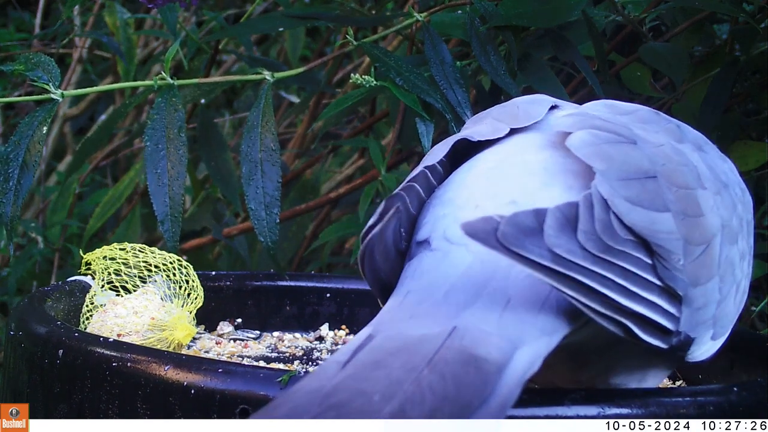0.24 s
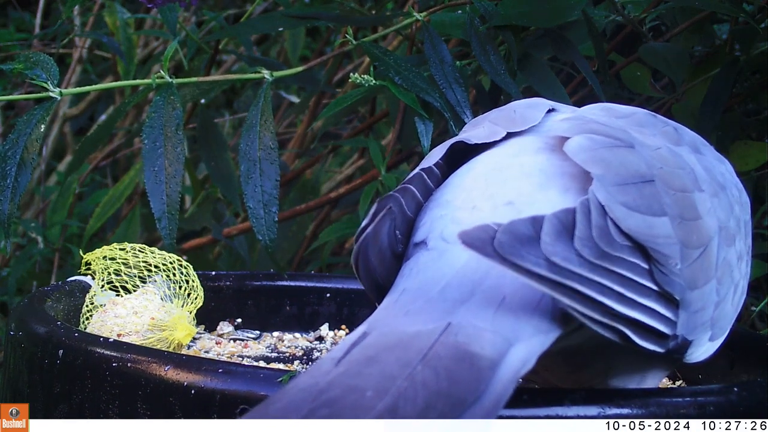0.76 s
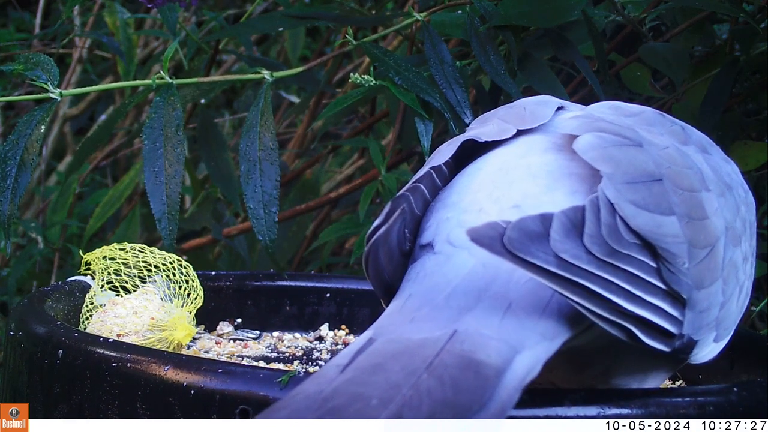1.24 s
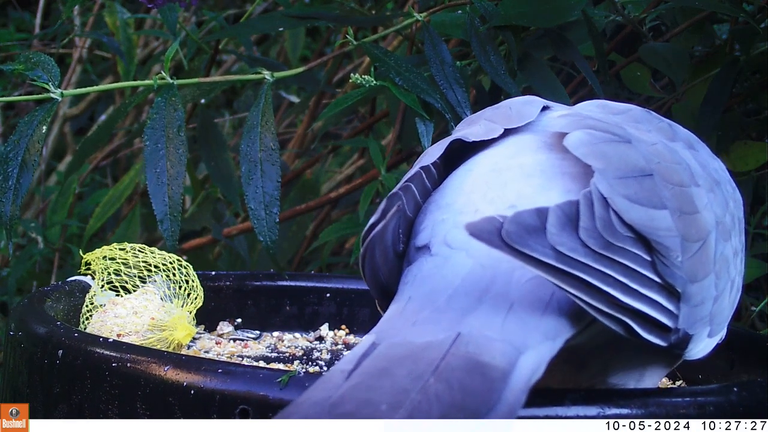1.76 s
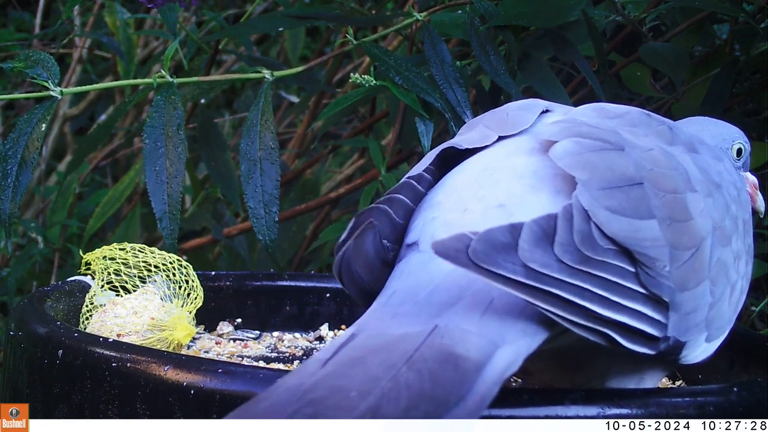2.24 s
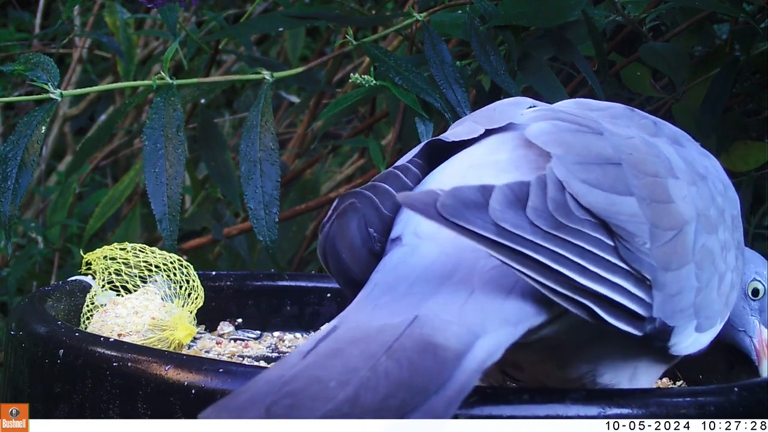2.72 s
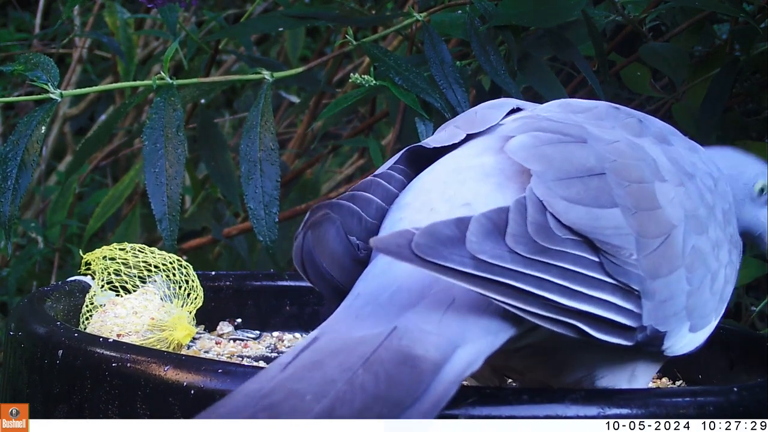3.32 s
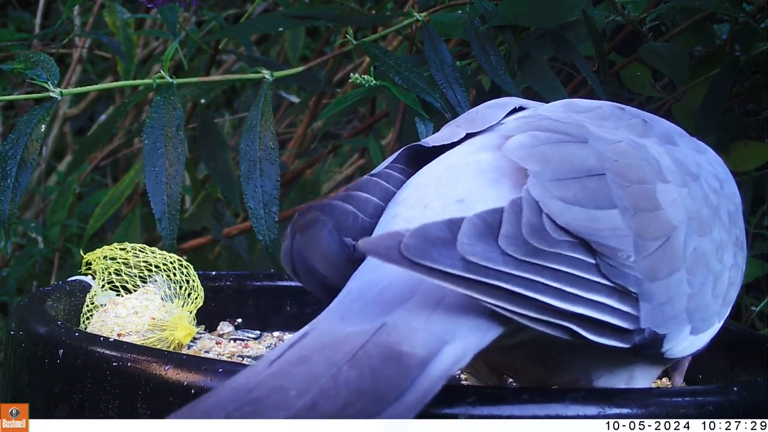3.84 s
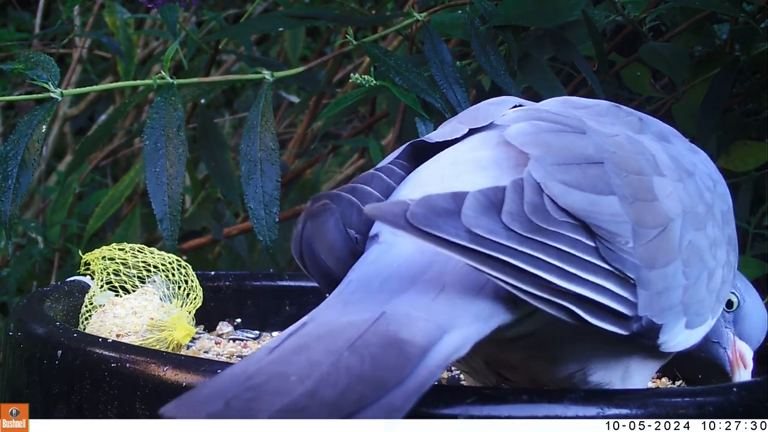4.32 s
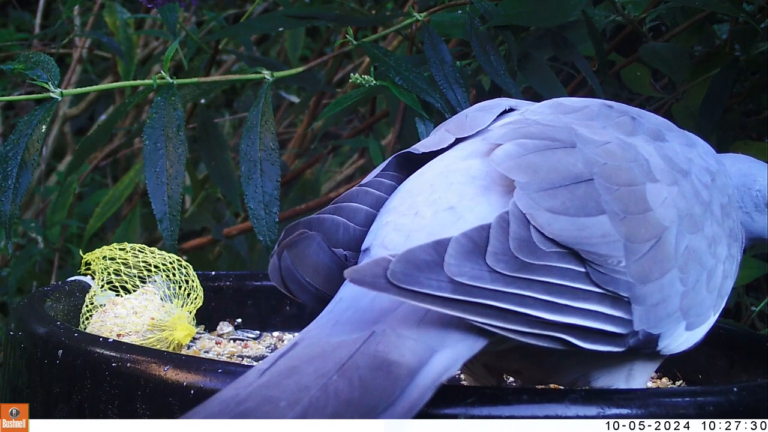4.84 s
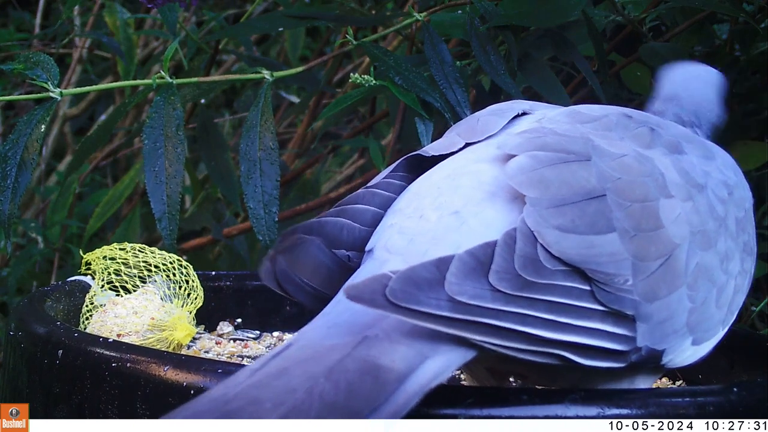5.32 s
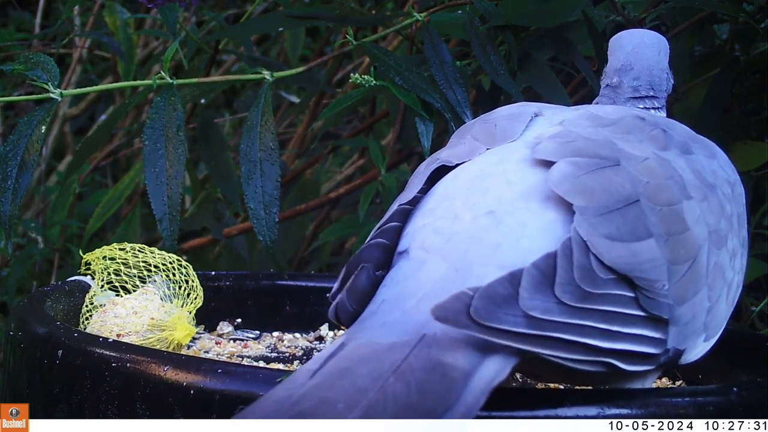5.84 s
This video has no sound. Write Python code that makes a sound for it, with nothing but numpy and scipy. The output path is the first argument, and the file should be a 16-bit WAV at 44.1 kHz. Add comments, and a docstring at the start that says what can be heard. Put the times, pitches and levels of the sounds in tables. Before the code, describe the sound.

A quiet garden heard from right beside a plastic seed dish. Throughout runs a steady deep rumble fading into soft hiss, with a low, slightly wavering hum. Very faint beak ticks come at 0.3, 1.1, 1.3 and 2.0 seconds. A quick falling chirp from a nearer small bird sounds at 0.8, fainter ones at 2.2 and 4.4. A distant songbird gives thin, echoing whistles and short buzzes from about 1.4, including a buzzy note at 2.6 and a whistle at 3.2. A small tap at 2.95 leads to a hard, bright, dry crack at 3.0, with tiny seeds pattering and light taps until 3.3. A soft tick falls at 4.0; small taps at 4.6 run into a second hard click at 4.63, slightly duller. The clearest distant whistle follows at 4.85, then faint ticks near 5.0 and a very faint high whistle at 5.8 over the rumble.

```python
"""Pigeon at a seed dish

A wood pigeon pecks seed from a plastic dish close by: filtered-noise ticks and cracks, a decaying ring of modes.
Two hard pecks stand out among light taps; loose seeds are sparse random echoes of each blow.
A songbird further off whistles and buzzes, and a nearer one chirps: gliding sines, sent through a noise echo.
Beneath lie a rumble falling into hiss, made of coloured noise, and a low hum of wavering partials."""
import sys
import numpy as np
from scipy import signal
from scipy.fft import rfft, irfft
from scipy.io import wavfile

SR = 44100
rng = np.random.default_rng(int(sys.argv[2]) if len(sys.argv) > 2 else 0)


def transcribe(u):
    """Save the signal u as a 16-bit wav file named by the first command-line argument.

    u: samples, shape (n,) or (channels, n), limited to [-1, 1]; the rate is SR.
    q: integer samples, one column per channel.
    """
    v = np.clip(np.atleast_2d(u).T, -1, 1)
    q = np.round(v * 32767).astype(np.int16)
    wavfile.write(sys.argv[1], SR, q)


N = 267642


def amp(db):
    """Decibels to gain."""
    return 10 ** (np.asarray(db) / 20)


def unit(x):
    """Scales to rms 1."""
    return x / np.sqrt(np.mean(abs(x) ** 2) + 1e-20)


def read(points, hz):
    """Reads a table along a log-frequency axis."""
    f, value = np.transpose(points)
    return np.interp(np.log(hz + 1), np.log(f + 1), value)


def add(mix, s, sound):
    """Mixes a sound in at time s."""
    part = mix[round(s * SR):][:len(sound)]
    part += sound[:len(part)]


def noise(spectrum, size):
    """Noise of rms 1 with the given colour."""
    hz = np.fft.rfftfreq(size, 1 / SR)
    white = rfft(rng.standard_normal(size))
    return unit(irfft(white * amp(read(spectrum, hz)), size))


def drift(rate_hz, size):
    """Smooth random motion: noise under a Gaussian low-pass about rate_hz wide, rms 1 over the scene."""
    hz = np.fft.rfftfreq(N, 1 / SR)
    white = rfft(rng.standard_normal(N))
    return unit(irfft(white * np.exp(-(hz / rate_hz) ** 2), N))[:size]


def delayed(x, seconds):
    """Delays a short sound by any fraction of a sample, as a phase slope."""
    size = 2 * len(x)
    hz = np.fft.rfftfreq(size, 1 / SR)
    return irfft(rfft(x, size) * np.exp(-2j * np.pi * hz * seconds))[:len(x)]


# Colour of the distant rumble falling into hiss, with a soft peak near 4 kHz:
# (frequency [Hz], relative density [dB per Hz])
AIR = [(3, -1), (14, 0), (45, -4), (90, -9), (160, -15.5), (290, -21.5), (750, -32), (1600, -39.5),
       (3200, -44.5), (3900, -43.5), (4700, -47), (7500, -49), (10000, -49.5), (13800, -49.5)]
# Partials of the low hum: (multiple of HUM_HZ, rms level [dB])
HUM = [(1, -37.5), (2, -43.5), (3, -53), (5, -53.5), (6, -57), (10, -62.5)]
HUM_HZ = 29.64


def background(air_db=-34, waver_hz=2, waver_depth=1.0):
    """Distant rumble and hiss, with a low hum whose partials waver in level and phase."""
    t = np.arange(N) / SR
    out = amp(air_db) * noise(AIR, N)
    for multiple, db in HUM:
        # complex motion moves level and phase together
        sway = 1 + waver_depth * (drift(waver_hz, N) + 1j * drift(waver_hz, N))
        tone = np.exp(2j * np.pi * (round(multiple) * HUM_HZ * t + rng.random()))
        out += amp(db) * unit((sway * tone).real)
    return out


# Decay of the garden's echo: (frequency [Hz], t60 [s])
GARDEN = [(500, 2), (4000, 0.89), (8000, 0.8), (14000, 0.73)]


def garden(x, build_s=0.0044):
    """Leaves, fences and walls scatter a sound into a tail that builds up and dies band by band."""
    hz, t, bands = signal.stft(rng.standard_normal(SR), SR, nperseg=256)
    decay = amp(-60 * t / read(GARDEN, hz)[:, None])
    build = 1 - np.exp(-t / build_s)
    tail = signal.istft(bands * decay * build, SR, nperseg=256)[1]
    return signal.fftconvolve(x, tail / np.linalg.norm(tail))[:N]


def whistles(notes, trill_hz=105, trill_spread=.35, waver=0.0033):
    """Sine glides with a fast, uneven trill of the pitch; a deep trill turns a whistle into a buzz."""
    out, unsteady, wander = np.zeros(N), drift(121.2, N), drift(40.0, N)
    trill_rate = trill_hz * (1 + trill_spread * unsteady)
    trill = np.sin(2 * np.pi * np.cumsum(trill_rate) / SR)
    for s, length, start_hz, end_hz, db, depth_hz in notes:
        at = np.arange(round(s * SR), min(round((s + length) * SR), N))
        glide = np.geomspace(start_hz, end_hz, len(at))
        hz = glide * (1 + waver * wander[at]) + depth_hz * trill[at]
        tone = np.sin(2 * np.pi * np.cumsum(hz) / SR)
        add(out, s, amp(db) * unit(tone * signal.windows.tukey(len(at), .5)))
    return out


# The far bird's clear whistles: (time [s], length [s], starting pitch [Hz], level before the mix [dB])
WHISTLES = [(1.372, .22, 5360, -64), (2.2, .09, 5410, -62), (3.165, 0.1, 4130, -43.5),
            (3.77, 0.2, 7810, -56.5), (3.94, .11, 7930, -54.5), (4.073, 0.23, 7550, -59),
            (4.475, 0.18, 7110, -50.5), (4.665, .09, 7720, -57), (4.835, .18, 3932, -32),
            (5.81, .25, 5520, -60)]
# The far bird's buzzy notes:
# (time [s], length [s], pitch [Hz], level before the mix [dB], trill depth [share of the pitch])
BUZZES = [(1.6, .05, 7150, -49.5, .08), (1.935, 0.048, 7150, -51.5, .1), (2.58, 0.098, 4640, -49.5, 0.057),
          (2.6, 0.14, 3760, -40, 0.047), (2.67, 0.072, 2900, -55, 0.034), (3.18, 0.16, 3704, -49, .12),
          (3.765, 0.051, 3870, -53.5, 0.046), (4.41, 0.11, 3780, -49.5, 0.034)]
SAG_OCTAVES_PER_S = 0.1205
QUIVER_HZ = 40  # trill depth of the clear whistles


def far_song():
    """Clear whistles sag a little in pitch and quiver slightly; buzzes hold their pitch under a trill."""
    notes = []
    for s, length, hz, db in WHISTLES:
        end_hz = hz * 2 ** (-SAG_OCTAVES_PER_S * length)
        notes.append((s, length, hz, end_hz, db, QUIVER_HZ))
    for s, length, hz, db, depth in BUZZES:
        notes.append((s, length, hz, hz, db, depth * hz))
    return whistles(notes)


# Down-slurred chirps of the nearer bird: (time [s], top pitch [Hz], level before the mix [dB])
CHIRPS = [(.803, 4620, -51.5), (2.161, 5550, -55.5), (4.38, 4700, -57.5)]
# all chirps fall at one speed to one pitch
CHIRP_OCTAVES_PER_S, CHIRP_END_HZ = 8.5, 3540


def near_chirps(trill_depth_hz=140):
    """Each chirp slides down from its top pitch, so a higher one lasts longer."""
    notes = []
    for s, top_hz, db in CHIRPS:
        length = np.log2(top_hz / CHIRP_END_HZ) / CHIRP_OCTAVES_PER_S
        notes.append((s, length, top_hz, CHIRP_END_HZ, db, trill_depth_hz))
    return whistles(notes)


# Ringing modes of the plastic dish: (frequency [Hz], level within the ring [dB], t60 [s])
DISH = [(900, -40, 0.042), (1210, -29, 0.017), (1740, -40, 0.079), (1850, -50, 0.02), (2120, -43, 0.078),
        (2403, -19.5, 0.032), (2815, -10, 0.0084), (3000, -17, 0.0076), (3774, -15.5, 0.028),
        (4240, -22, 0.035), (4580, -37, 0.01), (5200, -23.5, 0.013), (5580, -23, 0.014), (6570, -28, 0.016),
        (7370, -28, 0.031), (9640, -32.5, 0.022), (11180, -38, 0.018)]
# Colour of cracking husk and plastic: (frequency [Hz], relative density [dB per Hz])
CRACK = [(300, -17), (900, -21), (1600, -8.5), (2600, 0.5), (4000, 3.5), (6000, -7.5), (8300, -8.5),
         (10500, -3), (12000, -1.5), (13800, -27)]


def blow(bright_db, knock_hz, slack, seat_s=0.001266, touch_db=-11, tick_db=-17, tick_s=0.0015,
         crack_db=-21, crack_t60=0.038, ring_db=-3, knock_db=-7.0, knock_s=0.00032,
         wall_s=.00184, wall_db=-5, tilt=0.97):
    """The beak tip ticks on a seed, then knocks it into the dish, which rings; its wall reflects the knock."""
    t = np.arange(4096) / SR
    ring = np.zeros(len(t))
    for k, (hz, db, t60) in enumerate(DISH):
        # brightness tilts the modes above the knock, more with every octave
        hardness_db = tilt * bright_db * max(np.log2(hz / knock_hz), 0)
        envelope = amp(db + hardness_db - 60 * t / t60)
        ring += (-1) ** k * envelope * np.sin(2 * np.pi * hz * t)
    # the struck spot swings hard only briefly; slack stretches that swing
    age = t / (knock_s * slack)
    knock = age * np.exp(1 - age) * np.sin(2 * np.pi * knock_hz * t)
    body = amp(ring_db) * ring + amp(knock_db) * knock
    tick_envelope = (t / tick_s) * np.exp(2 - 2 * t / tick_s)
    tick = amp(tick_db + bright_db) * noise(CRACK, len(t)) * tick_envelope
    crack = amp(crack_db + bright_db - 60 * t / crack_t60) * noise(CRACK, len(t))
    seated = body + amp(wall_db) * delayed(body, wall_s) + crack
    # first touch, then the seed seats in the dish
    return tick + amp(touch_db) * body + delayed(seated, seat_s)


def rattle(length, count=30):
    """Loose seeds land at random moments as impulses, the later ones lighter on average."""
    when, size = rng.random(count), rng.standard_normal(count)
    train = np.zeros(SR // 4)
    at = np.clip((.004 + when * length) * SR, 0, len(train) - 1).astype(int)
    np.add.at(train, at, size * np.exp(-when))
    return train / np.linalg.norm(train)


# Beak on dish and seed: (time [s], force [dB], brightness [dB])
PECKS = [(0.2715, -41, -4), (1.094, -32.5, -2), (1.1215, -43, -10), (1.287, -45, -4), (2.039, -32, -1),
         (2.9574, -24.5, -12), (3.0215, -0.5, 1.5), (3.069, -33.5, -9), (3.206, -41, 9), (3.2726, -32.5, 1),
         (3.977, -30.5, -6), (4.3015, -45.5, -6), (4.57, -33.5, 4), (4.5776, -26.5, -3), (4.635, 1, -3),
         (4.8276, -31.5, 0.5), (5.016, -46, 10), (5.058, -40.5, 5)]
KNOCK_HZ = 3810  # pitch of the struck spot
# seeds at 0 dB force: level relative to the blow, and how long they keep landing
RATTLE_DB, RATTLE_S = -22.5, 0.055
# a lighter peck stirs the seeds more briefly, and they stand out more beside it (dB per dB of force)
RATTLE_SHORTENING, RATTLE_EXPOSURE = .44, 0.5


def pigeon(softening=0.093):
    """Every peck is one blow and the scatter of seeds that it throws up; both follow its force."""
    out = np.zeros(N)
    for s, force_db, bright_db in PECKS:
        # a light touch damps the struck spot less, so it sounds more like a short ping
        slack = amp(-softening * force_db)
        hit = amp(force_db) * blow(bright_db, KNOCK_HZ, slack)
        landing_s = RATTLE_S * amp(RATTLE_SHORTENING * force_db)
        seeds = amp(RATTLE_DB - RATTLE_EXPOSURE * force_db) * rattle(landing_s)
        add(out, s, hit)
        # every seed repeats the blow in miniature
        add(out, s + 0.001066, signal.fftconvolve(hit, seeds))
    return out


def scene():
    """The pecks are almost dry, the chirps a little wetter; the far song is mostly echo."""
    pecks, chirps, song = pigeon(), near_chirps(), far_song()
    direct = pecks + amp(-4.0) * chirps + amp(-12.0) * song
    scattered = amp(-32) * pecks + amp(-13) * chirps + amp(-9.0) * song
    return (direct + garden(scattered) + background())[None]


def record(dry, edge_hz=13870):
    """A steep low-pass closes off the top of the treble."""
    low_pass = signal.firwin(511, edge_hz, window=("kaiser", 9), fs=SR)
    return signal.oaconvolve(dry, low_pass[None], "same")


dry = scene()
out = record(dry)
transcribe(out)
```